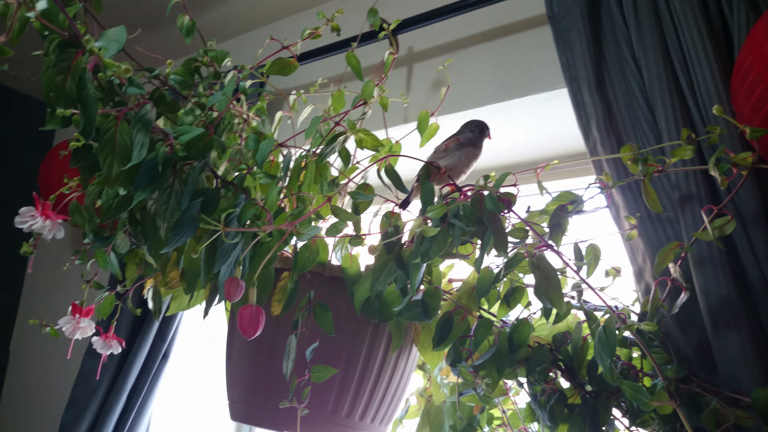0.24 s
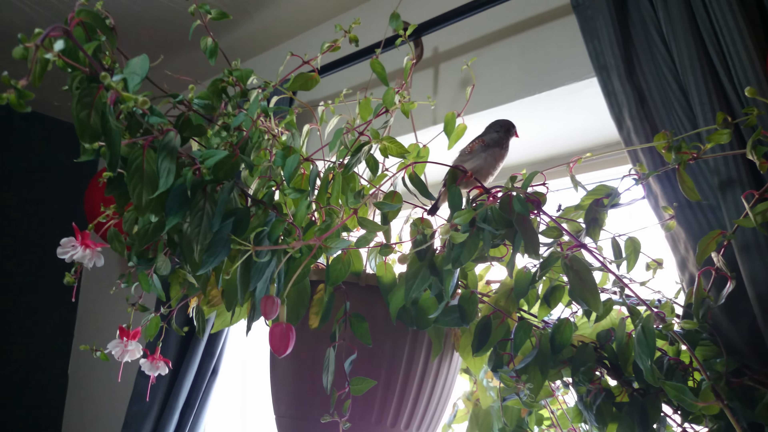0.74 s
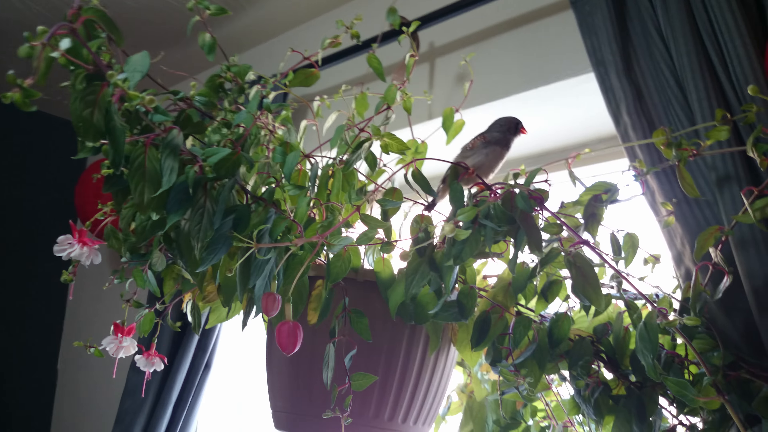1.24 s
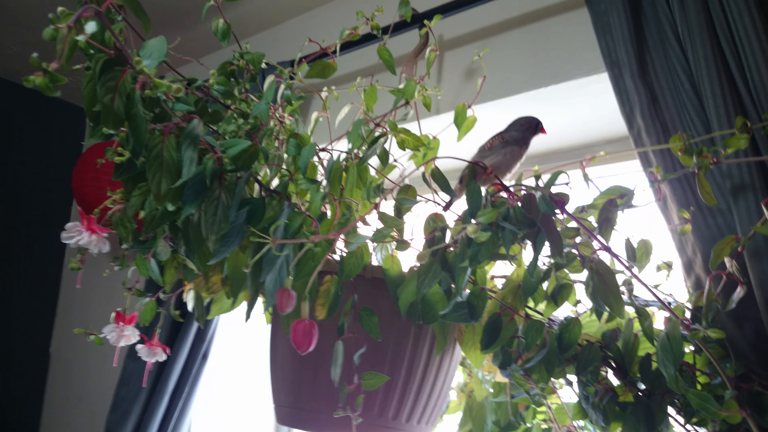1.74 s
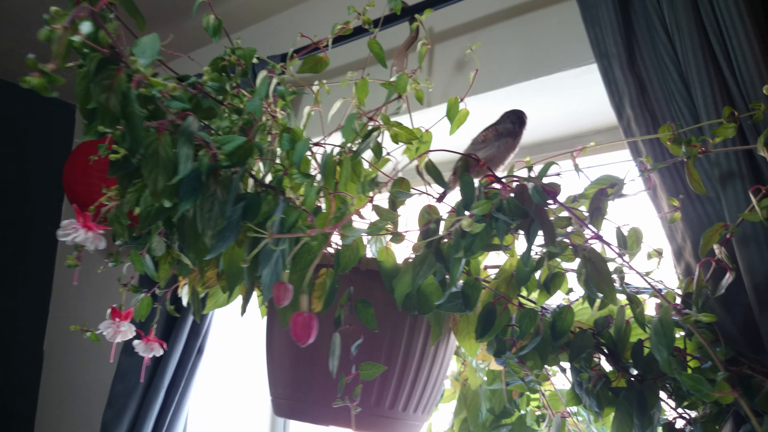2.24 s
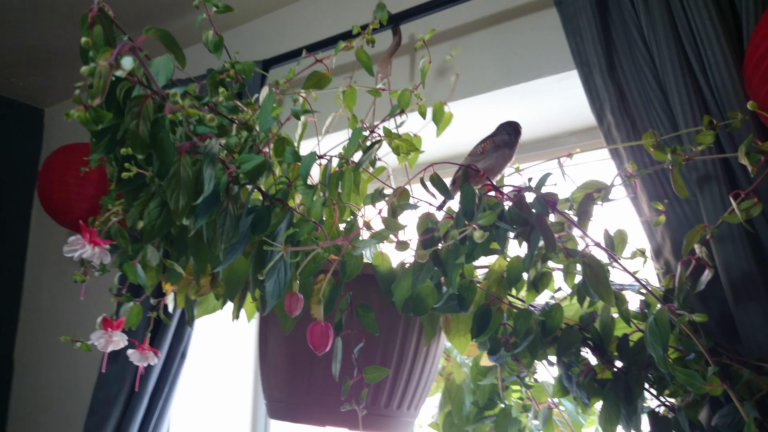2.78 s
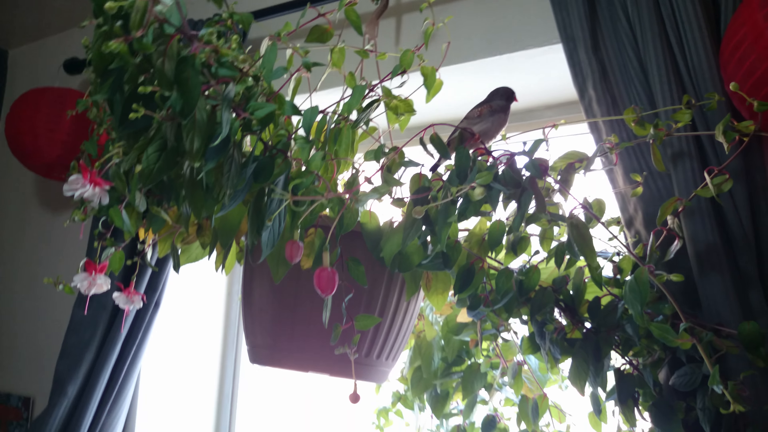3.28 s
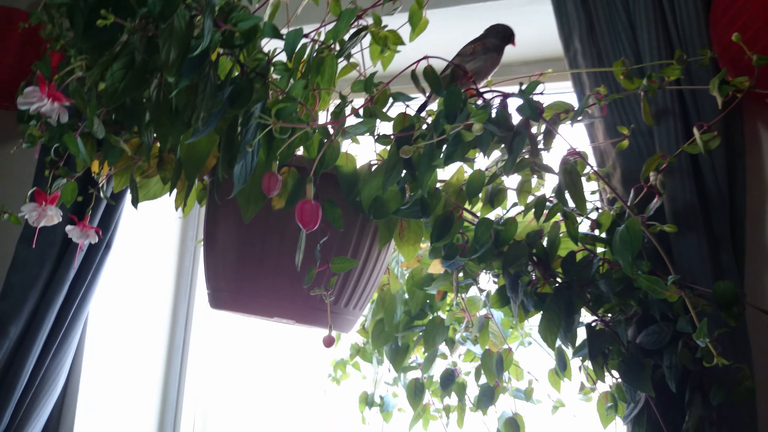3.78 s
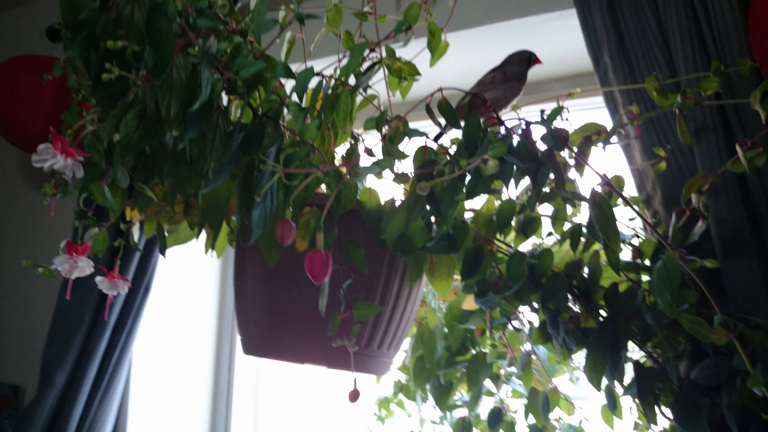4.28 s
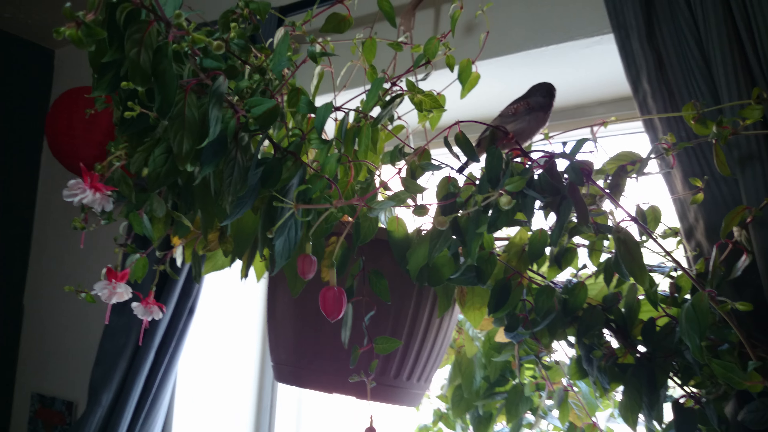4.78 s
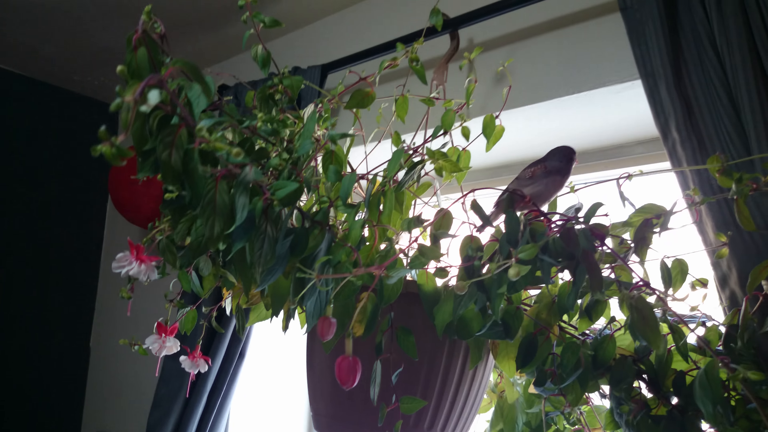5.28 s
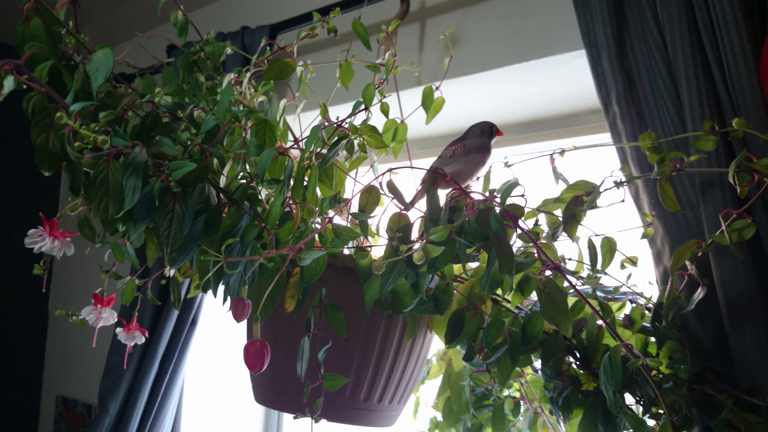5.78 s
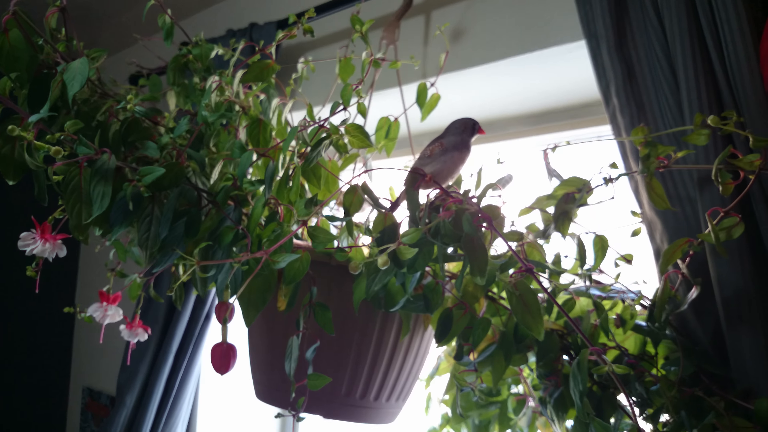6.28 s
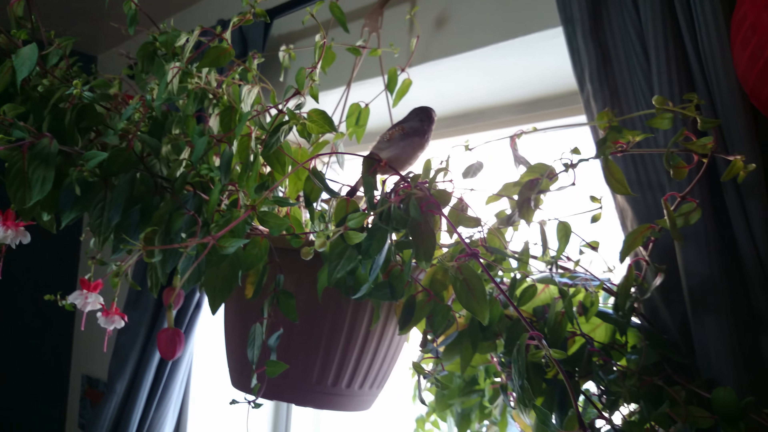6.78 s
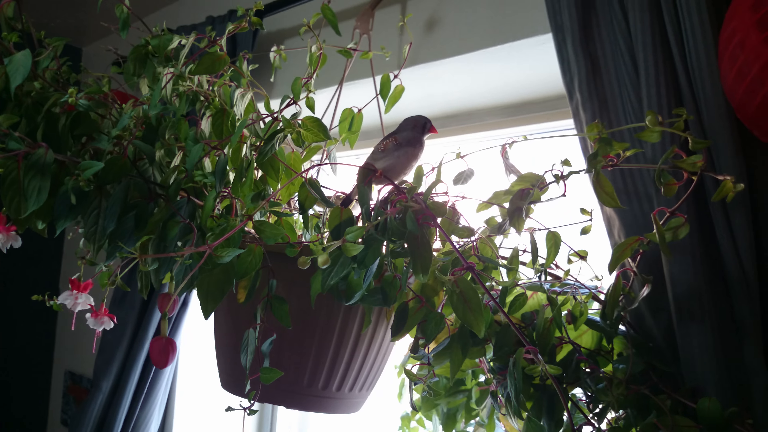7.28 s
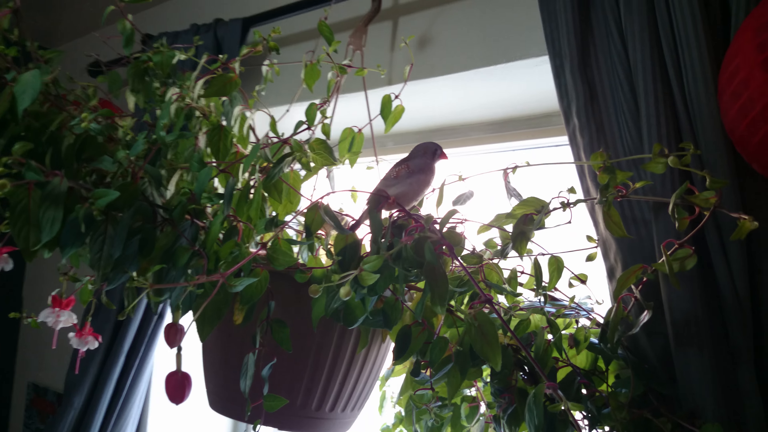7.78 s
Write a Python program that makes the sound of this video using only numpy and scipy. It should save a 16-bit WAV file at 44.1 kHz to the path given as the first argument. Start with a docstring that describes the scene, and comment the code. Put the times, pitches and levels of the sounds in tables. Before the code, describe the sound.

Small finches call indoors near a window. After a quiet start with faint handling bumps, one nasal call rises sharply, followed by soft short chirps that cluster near the middle with tiny peeps and ticks. A second, lower and quieter nasal call comes later, with soft thuds of a hand on the microphone, then a few weak chirps. The room rings briefly; low rumble and hiss lie beneath.

```python
"""Finches by the window

Small finches call from a hanging plant by the window of a quiet furnished room, before a two-port microphone.
Two long nasal calls and short quick chirps are harmonics of a syrinx shaped by throat and beak, ringing in
the room. Faint peeps are gliding near-sines and beak or claw ticks are damped rings.
Beneath lie filtered-noise rumble, room hum and hiss, a wavering far drone, thin steady tones,
and noise bumps of the hand on the microphone."""
import sys
import numpy as np
from scipy import signal
from scipy.io import wavfile
from scipy.ndimage import uniform_filter1d, map_coordinates

SR = 44100
rng = np.random.default_rng(int(sys.argv[2]) if len(sys.argv) > 2 else 0)


def master(y):
    """Save y as 16-bit WAV."""
    cut = np.clip(np.atleast_2d(y).T, -1, 1)
    pcm = np.round(cut * 32767)  # scale
    wavfile.write(sys.argv[1], SR, pcm.astype(np.int16))


N = 354563
T = np.arange(N) / SR

# long calls, one list of points per call: start_s, pitch_hz, level_db, beak_tilt_db_per_octave
LONG_CALL_POINTS = [
    [(1.36, 496, -50.5, 7), (1.39, 531.3, -42.5, -4), (1.415, 544.5, -37, 2.5), (1.465, 536.6, -38, 1),
     (1.49, 547, -31, 0.5), (1.508, 596, -34.5, 3), (1.527, 722, -33, -2), (1.553, 744, -28.5, 1),
     (1.57, 726.6, -36, -0.5), (1.588, 654, -29.5, -2.5), (1.598, 620, -60, -12)],
    [(5.445, 477, -60, 17), (5.462, 489, -48.5, 0), (5.482, 521.3, -43.5, -7), (5.54, 531, -42, -0.5),
     (5.553, 531.7, -46, -12), (5.578, 526.5, -33.5, -3), (5.607, 506.6, -40.5, -6.5),
     (5.625, 487.6, -42, 1)],
]
# short chirps: start_s, onset_s, fade_s, first_hz, held_hz, first_db, turn_db (where the fade starts),
# beak_tilt_db_per_octave, roughness (0-1, more is clipped)
CHIRP_ROWS = [(1.735, 0.031, 0.026, 421.3, 480, -73.5, -48.5, 4.5, 0.3),
              (2.155, 0.041, 0.019, 468.4, 482.3, -57.5, -52, 2.5, 0.11),
              (2.513, 0.041, 0.021, 469, 480, -62.5, -56, 4.5, .9),
              (3.11, 0.026, 0.018, 479, 470, -72, -68.5, 0, 0.96),
              (3.378, 0.038, 0.016, 448, 477, -61, -42.5, 7.5, 0.01),
              (3.68, .1, .08, 478, 470, -76, -68, 1, 1.05),
              (3.922, .048, .012, 444, 472.9, -56, -48.5, 5, 0.2),
              (4.055, 0.03, .008, 462, 474.3, -67, -52, 4.5, .9),
              (4.095, 0.023, 0.018, 487.5, 478.7, -58.5, -45.5, 5, 0.15),
              (4.195, .008, 0.032, 474, 464.6, -62, -74, -17, 0.95),
              (4.251, 0.012, 0.081, 463.5, 467.3, -74, -66, 4.5, 0.84),
              (4.42, 0.0072, 0.07, 474, 466, -46.5, -54, 5.5, 0.92),
              (5.951, 0.036, .02, 491.5, 473, -62, -59, 2.5, 0.31),
              (6.425, .043, 0.013, 416, 479.8, -64, -46, 6, 0.1),
              (7.899, 0.019, 0.033, 475, 481, -82, -73, 16, 1.05)]
# throat resonance in the long calls: pitch_hz, relative_level_db
LONG_CALL_THROAT = [(290, -76), (500, -50), (790, -39), (1050, -27.5), (1540, -25.5), (2200, -20),
                    (2700, -7.5), (3200, -2), (3900, -4.5), (4400, 0), (4900, -12.5), (5620, -11),
                    (8020, -32), (15500, -42)]
# throat resonance in the chirps: pitch_hz, relative_level_db
SHORT_CHIRP_THROAT = [(290, -60), (500, -20.5), (900, -21.5), (1770, -13.5), (2330, -6), (3560, -6),
                      (4350, -9), (5860, -8), (7470, -29), (8730, -27.5), (9930, -35), (12100, -29.5),
                      (15500, -36)]
# faint peeps: start_s, length_s, start_hz, end_hz, level_db (before the breathy flutter)
PEEP_ROWS = [(2.956, 0.056, 4410, 4530, -86), (3.013, 0.063, 2930, 3074, -80.5),
             (3.178, 0.079, 2090, 2050, -78), (3.493, .03, 1216, 1271, -77),
             (3.55, 0.012, 1274, 1209, -73.5), (3.622, 0.075, 2760, 3210, -73),
             (3.729, 0.017, 2900, 2740, -74), (3.79, 0.059, 2432, 2377, -73),
             (3.819, 0.0705, 2420, 2170, -74.5), (4.27, 0.18, 3090, 2820, -81.5),
             (4.358, 0.067, 1254, 1289, -75.5), (5.211, 0.043, 1222, 1406, -78),
             (6.053, 0.032, 1360, 1313, -79.5), (6.868, 0.047, 1340, 1325, -84.5),
             (7.653, 0.081, 1357, 1310, -85.5)]
# beak and claw ticks: start_s, peak_db (before damping), ring_hz, t60_s
TICK_ROWS = [(.985, -43, 5800, .005), (4.264, -52, 4325, .013), (4.352, -46, 5720, .012),
             (4.4, -53, 4000, .006), (4.592, -52, 2310, .014), (4.772, -57, 2300, .016)]
# where the calls stand between the ports: time_s, left_minus_right_db, right_port_lag_samples
CALL_FACING = [(1.4, -3.5, 2.5), (1.55, -3.5, 2.5), (2.2, -7, 2.5), (3.4, -3.5, 2.5), (4.4, -9.5, 2),
               (5.5, 0, -3), (5.9, 0, 1.5), (6.45, -4, 2)]
# decay time of the furnished room: pitch_hz, t60_s
ROOM_DECAY = [(800, 1), (3000, 0.56), (4500, 0.54), (6500, 0.59), (12000, 0.33)]
# bumps of the hand on the microphone: peak_s, level_db (before the balance of the ports)
HAND_BUMPS = [(.012, -61), (.075, -68), (.17, -74), (.26, -74), (5.485, -68), (5.56, -58), (5.629, -59),
              (5.68, -57.5), (5.73, -57.5), (5.785, -59.5), (5.86, -55), (6.089, -68.5), (6.171, -65.5),
              (6.23, -64.5), (6.29, -69.5), (6.87, -72), (7.135, -65.5), (7.21, -66)]
# spectrum of a hand bump: pitch_hz, relative_level_db_per_hz
HAND_SPECTRUM = [(15, -42), (25, -30), (44, -7), (64, -1), (124, -12), (288, -19.5), (432, -34),
                 (900, -30.5), (1170, -61), (1980, -120)]
# far drone: time_s, pitch_hz, level_db (before wavering and balance)
DRONE_PATH = [(0, 125, -101), (.5, 128, -75.5), (1.8, 123, -78), (3.0, 117.2, -75), (3.6, 135.3, -83),
              (3.85, 143.9, -69), (4.1, 148.4, -107), (4.35, 152, -71.5), (5.2, 151.8, -72),
              (5.4, 149.3, -99), (8.04, 142.5, -101)]
# room modes singing in the rumble: pitch_hz, width_hz, level_db (rms, before balance)
ROOM_MODES = [(122, 23, -76), (285.9, 13, -81)]
# spectrum of room rumble and microphone hiss: pitch_hz, relative_level_db_per_hz
FLOOR_SPECTRUM = [(15, -40), (25, -22.5), (53, -7), (123, -7.5), (156, -10), (247, -21), (283, -18),
                  (585, -23.5), (1310, -23), (1500, -25.5), (2650, -22.5), (5060, -30.5), (5950, -25),
                  (8440, -36), (15700, -31)]
# thin steady tones: pitch_hz, level_db (rms)
WHINE_TONES = [(6024, -91.5), (6202, -102), (7973, -100)]
# likeness of the two ports in the noises: pitch_hz, correlation (-1 to 1)
PORT_LIKENESS = [(60, 0.65), (180, 0.51), (550, 0.42), (1650, -0.064), (4970, -0.11), (15000, -0.062)]
# balance of the two ports in the noises: pitch_hz, left_minus_right_db
PORT_BALANCE = [(60, -12.5), (180, 4.5), (550, 0), (1650, -1), (4970, -4), (15000, 0)]

CLEAR_ROUGH, ROUGH_PER_GLIDE = 0.004, 0.01   # roughness of a held pitch; added per octave a second of glide
PITCH_SHARE, SAG_HZ = .75, 6   # the held pitch is reached at this share of the onset, and sags in the fade
CLOSING_TILT_DB = -10.5   # dB per octave added as the beak shuts in the fade
FADE_DB = 11.5   # a chirp ends this far under its level at the start of the fade
BUMP_S = 0.016   # standard deviation of a bump's bell shape
FLOOR_DB = -70
CUTOFF_HZ = 16100
OFFSET = -.0003   # recorder zero offset, full scale = 1


def voice(calls, throat, edge_s, rasp_hz, closing_s, spread):
    """Pulses of the syrinx as harmonics weighed by the throat; roughness scatters each harmonic into noise."""
    pitch, level_db, tilt_db, rough = in_time(np.concatenate(calls))
    sounding = sum((T >= rows[0][0]) & (T <= rows[-1][0]) for rows in calls) > 0
    gate = uniform_filter1d(sounding * 1., size=round(edge_s * SR))
    on = gate > 1e-6
    pitch, level_db = uniform_filter1d([pitch, level_db], size=400)
    phase = 2 * np.pi * np.cumsum(pitch[on]) / SR
    order = np.arange(1, 35)[:, None]
    hz = order * pitch[on]

    # the beak colours the middle range
    beak_db = tilt_db[on] * np.log2(np.clip(hz, 1800, 7000) / 3500)
    strength = from_db(at_hz(throat, hz) + beak_db) * (hz < CUTOFF_HZ)
    strength = strength / np.sqrt((strength ** 2).sum(0) / 2)

    # the voice breaks up as the syrinx closes, just before the call stops
    n_closing = round(closing_s * SR)
    still_open = uniform_filter1d(np.roll(sounding * 1., -n_closing), size=n_closing)
    closing = (1 - still_open) * np.roll(sounding, n_closing)
    rough = np.clip(rough + closing, 0, 1)[on]

    # neighbouring harmonics scatter apart
    rasps = np.array([rasp(rasp_hz)[on] for _ in range(4)])
    scatter = rasps[order[:, 0] % 4]
    strength = strength * (np.sqrt(1 - rough) + np.sqrt(rough) * scatter)

    # the windpipe delays the high harmonics, which smears each pulse
    out = np.zeros(N)
    out[on] = (strength * np.cos(order * phase - spread * order ** 2)).sum(0)
    return out * gate * from_db(level_db)


def long_call(rows):
    """Controls of a long call: the voice roughens while its pitch glides."""
    s, hz = np.transpose(rows)[:2]
    glide = np.abs(np.gradient(np.log2(hz), s))   # octaves a second
    return np.column_stack([rows, CLEAR_ROUGH + ROUGH_PER_GLIDE * glide])


def chirp(s, onset_s, fade_s, first_hz, held_hz, first_db, turn_db, tilt_db, rough):
    """Controls of a chirp: the level moves from first_db to turn_db, mostly swelling,
    twice fading from a loud start, while the pitch glides to held_hz; then the beak shuts."""
    held_s = s + PITCH_SHARE * onset_s
    held_db = first_db + PITCH_SHARE * (turn_db - first_db)
    turn_s = s + onset_s
    return [(s, first_hz, first_db, tilt_db, rough),
            (held_s, held_hz, held_db, tilt_db, rough),
            (turn_s, held_hz, turn_db, tilt_db, rough),
            (turn_s + fade_s, held_hz - SAG_HZ, turn_db - FADE_DB, tilt_db + CLOSING_TILT_DB, rough)]


def peeps(breathy):
    """Short gliding whistles that swell and fade, unsteady in strength."""
    out = np.zeros(N)
    for s, length_s, start_hz, end_hz, level_db in PEEP_ROWS:
        n = round(length_s * SR)
        phase = 2 * np.pi * np.cumsum(np.linspace(start_hz, end_hz, n)) / SR
        swell = 2 * np.sqrt(np.hanning(n))   # makes the level an rms
        out[round(s * SR):][:n] += from_db(level_db) * swell * np.sin(phase)
    return out * (1 + breathy * rasp(190))


def ticks():
    """Each tick is one quickly damped ring with a soft start."""
    out, t = np.zeros(N), T[:2000]
    for s, peak_db, hz, t60 in TICK_ROWS:
        shape = (1 - np.exp(-t / 0.0001)) * from_db(peak_db - 60 * t / t60)
        out[round(s * SR):][:len(t)] += shape * np.sin(2 * np.pi * hz * t)
    return out


def at_ports(birds):
    """Direct sound at the two ports: they differ in level and in arrival time."""
    pan_db, lag = in_time(CALL_FACING)
    right = map_coordinates(birds + 1e-18, [np.arange(N) - lag], order=3)
    return from_db([pan_db / 2, -pan_db / 2]) * np.stack([birds, right])


def room(x, early_db, early_t60, late_db, blur):
    """Quick reflections from window and wall, then a tail that dies band by band, unlike on the two sides."""
    t, white = T[:SR], rng.standard_normal((2, 2, SR))
    late = 0
    for hz, sos in bands(380, 15000):
        late = late + signal.sosfilt(sos, white[0]) * from_db(-60 * t / at_hz(ROOM_DECAY, hz))
    early = white[1] * from_db(-60 * t / early_t60)
    onset = np.clip((t - .001) / 0.0027, 0, 1)
    late, early = late * onset, early * onset
    late, early = (e / np.sqrt((e ** 2).sum(1, keepdims=True)) for e in (late, early))

    # bird and microphone keep moving, so the lines of the tail are blurred
    blurred = x * (np.sqrt(1 - blur) + np.sqrt(blur) * rasp(250))
    tail = signal.fftconvolve(blurred[None], late, axes=1)[:, :N]
    reflections = signal.fftconvolve(x[None], early, axes=1)[:, :N]
    return from_db(early_db) * reflections + from_db(late_db) * tail


def hand():
    """Fingers shifting on the case: bumps that reach mostly the right port, and a faint rustle."""
    level = sum(from_db(db) * np.exp(-.5 * ((T - s) / BUMP_S) ** 2) for s, db in HAND_BUMPS)
    treble = signal.butter(2, 9000, "high", fs=SR, output="sos")
    rustle = signal.sosfilt(treble, rng.standard_normal((2, N)))
    thud = sides(-11.5) * noise(HAND_SPECTRUM, 25.7, 900, patchy_db=1.0)
    return level * (thud + from_db(-13.0) * rustle)


def drone():
    """A far engine note, one sine that wavers in strength."""
    hz, level_db = in_time(DRONE_PATH)
    strength = np.sqrt(2) * from_db(level_db + 1.5 * drift(3.5))
    return strength * np.sin(2 * np.pi * np.cumsum(hz) / SR)


def hum():
    """Room modes: noise through narrow low resonances."""
    out = 0
    for hz, width_hz, db in ROOM_MODES:
        r = np.exp(-np.pi * width_hz / SR)
        poles = [1, -2 * r * np.cos(2 * np.pi * hz / SR), r * r]
        ringing = signal.lfilter([1, 0, -1], poles, rng.standard_normal(N))
        out = out + from_db(db) * rms_one(ringing)
    return out


def noise(spectrum, low_hz, high_hz, patchy_db):
    """Bands of stereo noise, each with its own level, likeness and balance, swelling together from rms 1."""
    out, white = 0, rng.standard_normal((2, 2, N))
    for k, (hz, sos) in enumerate(bands(low_hz, high_hz)):
        mid, side = signal.sosfilt(sos, white[k % 2])
        alike = at_hz(PORT_LIKENESS, hz)
        gain = from_db(at_hz(spectrum, hz)) * sides(at_hz(PORT_BALANCE, hz))
        out = out + gain * (np.sqrt(1 + alike) * mid + np.sqrt(1 - alike) * side * [[1], [-1]])
    return out / out.mean(0).std() * from_db(patchy_db * drift(3.6))


def whine():
    """Thin steady tones, slightly unsteady in phase."""
    out = 0
    for hz, db in WHINE_TONES:
        out = out + np.sqrt(2) * from_db(db) * np.sin(2 * np.pi * hz * T + 0.92 * drift(10.6))
    return out


def rasp(hz):
    """Noise cut steeply above hz; rms 1."""
    return rms_one(signal.sosfilt(signal.butter(6, hz, fs=SR, output="sos"), rng.standard_normal(N)))


def drift(hz):
    """Noise slower than hz; rms 1."""
    r = np.exp(-2 * np.pi * hz / SR)
    slow = signal.lfilter([1], [1, -2 * r, r * r], rng.standard_normal(N + SR))
    return rms_one(slow[SR:])   # the filter settles in the first second


def bands(low_hz, high_hz):
    """Third-octave band-passes with their centres."""
    edges = low_hz * 2 ** np.arange(0, np.log2(high_hz / low_hz) + 1 / 3, 1 / 3)
    return [(np.sqrt(a * b), signal.butter(2, [a, b], "band", fs=SR, output="sos"))
            for a, b in zip(edges, edges[1:])]


def sides(pan_db):
    """Left and right gains for a level difference, left minus right."""
    return from_db([[pan_db / 2], [-pan_db / 2]])


def in_time(rows):
    """Columns of a table joined by straight lines."""
    s, *columns = np.transpose(rows)
    return [np.interp(T, s, c) for c in columns]


def at_hz(points, hz):
    """A spectrum read on a log-frequency axis."""
    points_hz, values = np.transpose(points)
    return np.interp(np.log(hz), np.log(points_hz), values)


def from_db(db):
    """Decibels as an amplitude factor."""
    return 10 ** (np.asarray(db) / 20)


def rms_one(x):
    """A signal scaled to rms 1."""
    return x / np.sqrt(np.mean(x ** 2) + 1e-20)


def scene():
    """Birds by the window with their echo, then the hand and the quiet room."""
    loud = voice([long_call(rows) for rows in LONG_CALL_POINTS], LONG_CALL_THROAT,
                 edge_s=.008, rasp_hz=290, closing_s=0.0041, spread=0.21)
    soft = voice([chirp(*row) for row in CHIRP_ROWS], SHORT_CHIRP_THROAT,
                 edge_s=0.015, rasp_hz=290, closing_s=0.0074, spread=0.12)
    soft += peeps(breathy=0.65)
    near = ticks()
    direct = at_ports(loud + soft + near)

    # soft chirps are not aimed at the microphone, so more of them arrives by the walls
    sent = .85 * loud + 1.25 * soft + .3 * near
    echo = sides(-3.0) * room(sent, early_db=-2.0, early_t60=0.18, late_db=-6.0, blur=0.86)

    low_tones = (drone() + hum()) * sides(-3.0)
    floor = from_db(FLOOR_DB) * noise(FLOOR_SPECTRUM, 25, 16500, patchy_db=.15)
    return direct + echo + hand() + low_tones + floor + whine()


def record(dry):
    """The recorder cuts the top; its zero sits slightly low."""
    low_pass = signal.cheby2(20, 70, CUTOFF_HZ, fs=SR, output="sos")
    return signal.sosfilt(low_pass, dry + OFFSET)


dry = scene()
out = record(dry)
master(out)
```